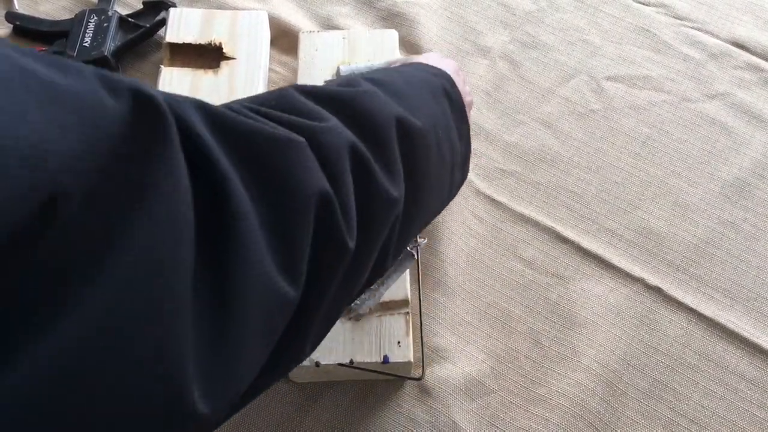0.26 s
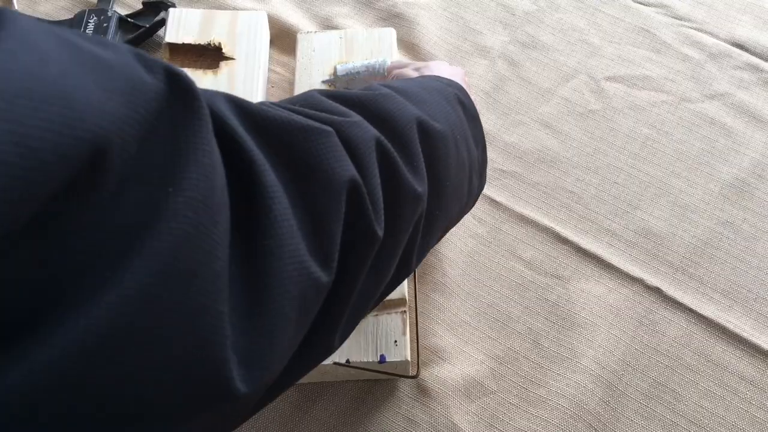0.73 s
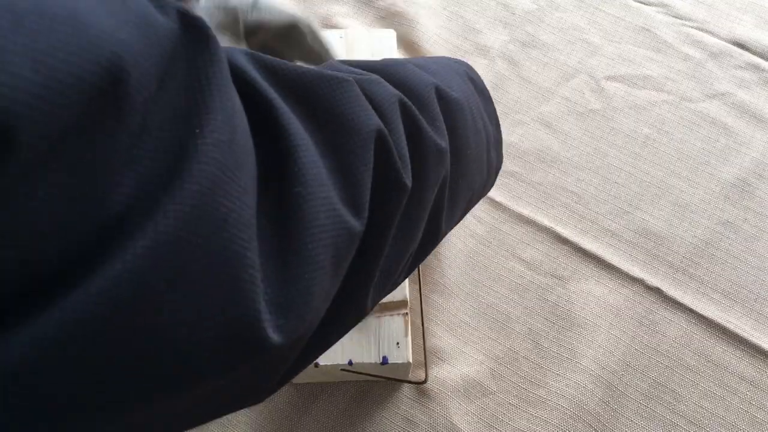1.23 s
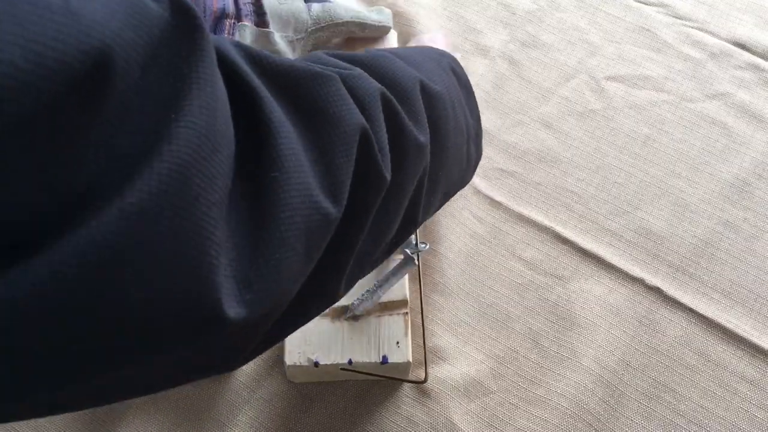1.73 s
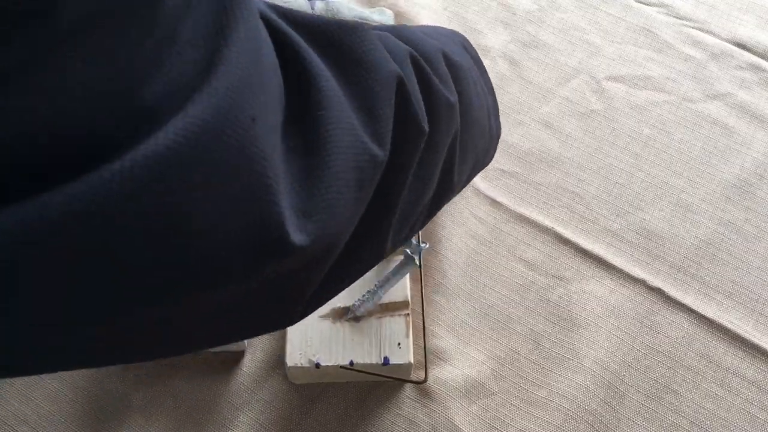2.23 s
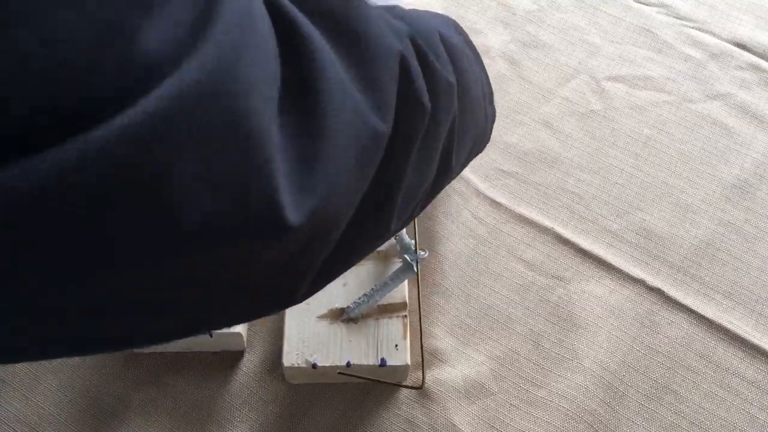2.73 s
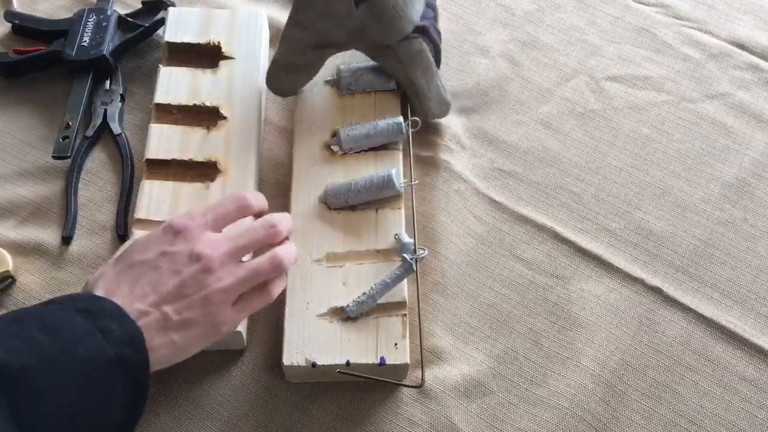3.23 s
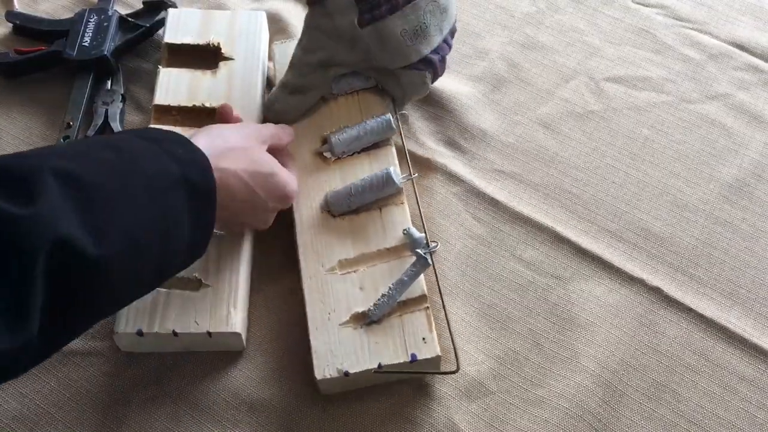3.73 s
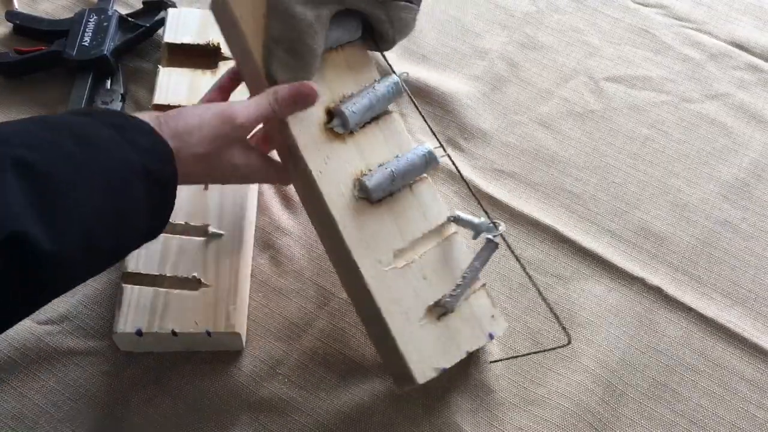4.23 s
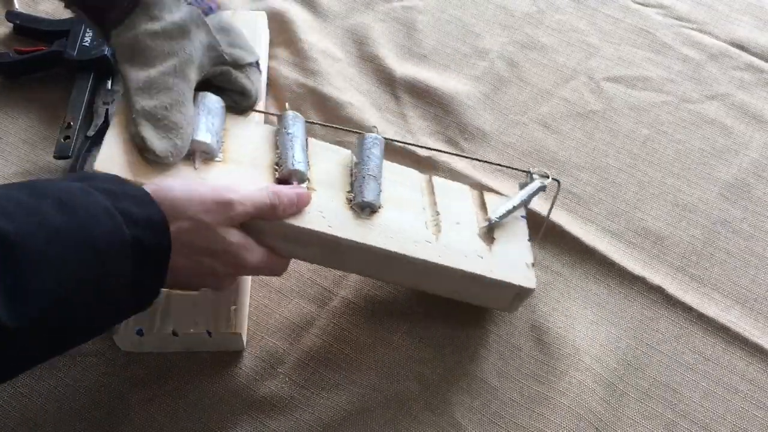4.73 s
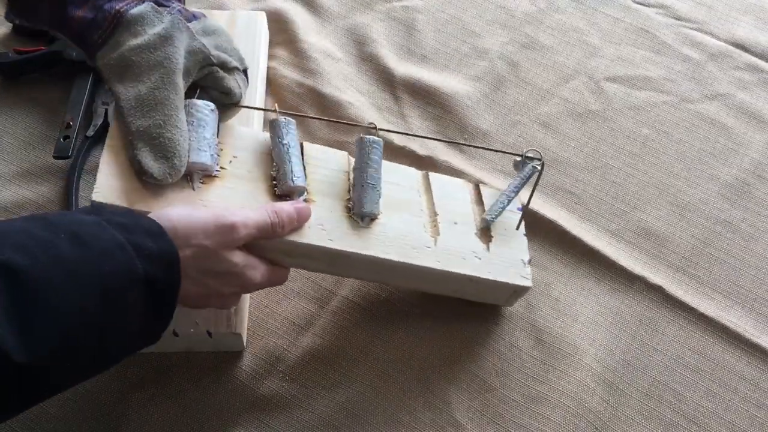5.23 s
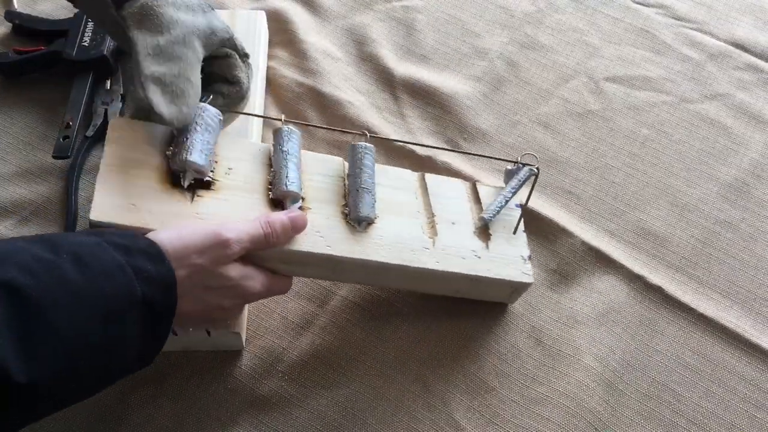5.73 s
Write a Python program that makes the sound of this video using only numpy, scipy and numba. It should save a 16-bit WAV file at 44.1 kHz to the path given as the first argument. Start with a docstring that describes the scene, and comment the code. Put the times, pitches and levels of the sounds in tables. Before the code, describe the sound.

Close, centred pickup of hands working on a cloth-covered table. At first sparse hollow wood knocks, faint squeaks, light jiggling of metal and soft table thuds over low room rumble; next, stronger fabric swishes. After four seconds the block drags and its wire chatters brightly; from five seconds, crisp snaps of lead leaving the grooves, with clacks and small tinks.

```python
"""First a sleeve swishes over a cloth-covered table, and twisted lead sinkers squeak in a wooden mould.
Hands then knock the wood (short clacks and hollow ringing modes), sinkers jiggle and the table thuds.
Around three seconds in, the cloth strokes (uneven, filtered noise) grow stronger. Past four seconds the
block is turned and dragged with a rasp and squeal (friction noise in resonances), and its wire frame
rattles. From five seconds, sinkers snap free as sharp clicks. The small room rumbles softly throughout."""
import sys
import numpy as np
from scipy import signal
from scipy.fft import rfft, irfft
from scipy.io import wavfile
from scipy.ndimage import uniform_filter1d
from numba import njit

SR = 44100
rng = np.random.default_rng(int(sys.argv[2]) if len(sys.argv) > 2 else 0)


def transcribe(signal):
    """Save signal, clipped to [-1, 1], as a 16-bit WAV file at the path in sys.argv[1]."""
    frames = np.atleast_2d(signal).T
    limited = np.clip(frames, -1, 1)
    pcm = np.round(limited * 32767).astype(np.int16)
    wavfile.write(sys.argv[1], SR, pcm)


N = 262836  # length of the scene [samples]
T = np.arange(SR // 4) / SR  # time since a blow [s]

# Hands knock the wood: (time [s], clack level [dB], clack pitch [Hz], hollow body level [dB],
# body pitch [Hz], bright edge level [dB])
KNOCKS = [(0.185, -58, 1220, -47, 360.5, -75), (0.985, -44, 1306, -35, 359, -57),
          (1.158, -49, 1456, -56, 356, -54), (1.265, -51, 1304, -71, 366, -79),
          (1.321, -54.5, 1290, -69, 353, -81), (1.6394, -46.5, 1700, -45.5, 379, -44.5),
          (1.649, -45.5, 1750, -44, 256.6, -50), (1.737, -51.5, 1140, -41, 237, -66.5),
          (1.775, -57, 1310, -48, 250, -63), (1.925, -45.5, 1370, -64, 344, -70),
          (2.0, -67, 1200, -44, 247, -70), (2.455, -54.5, 1186, -55.5, 376, -56.5),
          (2.835, -57, 1460, -55, 257, -51), (3.577, -73, 1000, -48, 315, -54.5),
          (4.217, -47, 1350, -43, 328, -45.5), (4.229, -44.5, 1090, -45, 269, -45.5),
          (4.761, -53, 1190, -68, 357, -55), (5.014, -46.5, 1230, -64, 364, -67),
          (5.057, -44.5, 1060, -66, 358, -49), (5.0818, -37, 1015, -44, 292, -45.5),
          (5.267, -49, 750, -53, 365, -53), (5.457, -48, 1050, -57, 246, -56),
          (5.898, -38.5, 922, -43, 242, -45), (5.954, -44.5, 900, -52, 300, -53)]
# A clack's colour: (ratio to its pitch [-], relative level per Hz [dB])
CLACK_COLOUR = [(.2, 0), (.5, -3.5), (.8, 7), (1, 0.5), (1.3, 3.5), (1.7, -13.5), (3, -14), (6, -44)]
# The hard edge of a knock: (frequency [Hz], relative level per Hz [dB])
EDGE_COLOUR = [(1200, -2), (2100, 0), (3300, -2), (4200, -9.5), (5500, -16), (9000, -16.5), (16000, -25)]
# Ringing of the wooden block: (ratio to the body pitch [-], relative level [dB], time to fall 60 dB [s])
BLOCK_MODES = [(.55, 11.5, 0.045), (.7, -10, 0.021), (0.917, 2.5, 0.14), (1.002, -11, 0.14),
               (1.142, -2.5, 0.24), (1.3, 2.5, 0.084), (1.5, -16, 0.094)]
CONTACT_T60_S = 0.058  # the main noise of a clack or edge falls 60 dB in this time

# Lead snaps free of its groove: (time [s], tick level [dB], woody crack level [dB])
SNAPS = [(5.0145, -38, -46.5), (5.029, -28.5, -50), (5.046, -30, -58), (5.0563, -29.5, -56),
         (5.069, -37, -66), (5.097, -40, -60), (5.4135, -21, -32.5), (5.926, -34, -56)]
# Bright tick of metal on a hard edge: (frequency [Hz], relative level per Hz [dB])
TICK_COLOUR = [(1500, -40), (4500, -27), (6400, -21), (7200, -24), (8130, -16), (9800, -20), (11300, -10),
               (12400, -11), (13700, -2), (14600, -3), (15700, 0), (16500, -2), (17500, -12)]
# Woody crack of a snap: (frequency [Hz], relative level per Hz [dB])
CRACK_COLOUR = [(300, -15), (1100, -11.5), (1700, -27), (2500, -5.5), (3050, -6), (3800, -8), (4400, -12),
                (5200, -12), (9000, -21)]
# Ringing of the groove wall: (frequency [Hz], relative level [dB], time to fall 60 dB [s])
GROOVE_MODES = [(2660, 0, 0.011), (3140, -4, 0.01), (3670, 5, 0.0029), (4200, -13, 0.022),
                (6440, -11.5, 0.0083)]

# Shoves that scrape the block along: (start [s], length [s], level before mixing its parts [dB],
# squeal pitch before its wobble [Hz])
SHOVES = [(4.38, .11, -52, 1023), (4.554, 0.031, -52.5, 865), (4.673, 0.059, -54.5, 957),
          (4.843, 0.063, -55.5, 960), (5.051, 0.062, -48.5, 986)]
SHOVE_ATTACK_S, SHOVE_RELEASE_S = 0.034, 0.02
# Rasp of the dragged block: (frequency [Hz], relative level per Hz [dB])
RASP_COLOUR = [(500, 15), (900, -16), (1700, -25), (2400, 10), (3000, 2), (3900, 10), (4600, -12),
               (5100, -7), (6200, 0), (7300, 6), (8400, 9.5), (11000, -5)]
# Sharp resonances of the scraping frame: (middle frequency [Hz], width [Hz], middle relative level [dB])
FRAME_MODES = [(864, 75, 3), (1282, 34, 7), (1730, 37, -0.5), (1845, 69, -11), (2950, 140, 1),
               (4510, 240, -0.5), (5500, 120, -2.5), (6400, 290, -6), (9800, 590, -12), (11900, 990, -3.5)]

# Bouts of the wire frame rattling: (start [s], length [s], first low ring [dB], first high ring [dB])
RATTLES = [(4.4105, .01, -45, -46.5), (4.534, .055, -38.5, -36.5), (4.628, .055, -49, -44.5),
           (4.845, .01, -48, -44.5)]
# Low bending modes of the wire: (frequency [Hz], relative level [dB], time to fall 60 dB [s])
WIRE_LOW = [(883, 0.5, 0.082), (871.3, 0.5, 0.077), (960, -20, 0.059), (1234, -6.5, 0.12), (1470, -23, 0.1),
            (1745, -13, 0.14), (1920, -14.5, 0.15), (2840, -20, 0.041)]
# High modes of the wire: (frequency [Hz], relative level [dB], time to fall 60 dB [s])
WIRE_HIGH = [(8400, -8, .06), (11960, -7, .06), (12345, -5, .07), (12750, -7, .07), (13472, 0, .12),
             (14730, -8, .04)]
# Wire chattering on wood: (frequency [Hz], relative level per Hz [dB])
CHATTER_COLOUR = [(300, -31), (650, 7), (950, 13.5), (1900, 0), (2400, -3.5), (4400, -7), (5200, -8),
                  (9000, -4), (12000, -27)]
# Average time between bounces, its uneven share, and the 60 dB fall time of the chatter noise
BOUNCE_S, BOUNCE_SCATTER, CHATTER_T60_S = .02, .1, 0.12
BOUNCE_LOW_DB, BOUNCE_HIGH_DB = -0.3, -1  # change at each bounce: the high ring weakens sooner

# Loose sinkers jiggle: (start [s], length [s], middle level [dB], lowest pitch [Hz], highest pitch [Hz])
JIGGLES = [(1.168, .18, -69, 1090, 2980), (1.655, .15, -66.5, 1170, 3080), (2.458, .14, -73, 1100, 2600),
           (4.407, 0.14, -55, 990, 5970), (4.631, 0.19, -61, 1000, 5000), (5.028, .085, -49.5, 900, 4000),
           (5.909, .05, -55, 900, 4020)]
JIGGLE_PER_S, JIGGLE_SCATTER_DB, JIGGLE_T60_S = 49, 4, .02

# Lead squeaking as it is twisted: (start [s], length [s], level [dB])
SQUEAKS = [(0.179, 0.041, -66), (0.248, 0.021, -61), (0.293, 0.021, -65)]
SQUEAK_START_HZ, SQUEAK_SAG_HZ_PER_S = 3770, 2500

# Brief rubs of finger, lead or wood: (time of peak [s], level [dB], pitch [Hz],
# time for the swell to fall to about a third on either side [s])
RUBS = [(0.267, -57.5, 2280, 0.013), (2.846, -45, 1360, 0.0088), (2.839, -51, 11900, 0.0079),
        (3.335, -53.5, 715, 0.004), (3.627, -48.5, 1400, 0.0059), (4.178, -51, 1470, 0.012),
        (4.467, -53.5, 5040, 0.021), (4.576, -47.5, 4530, .004), (4.841, -51, 4160, 0.015),
        (5.286, -52.5, 4460, 0.016), (5.391, -51, 1130, 0.033), (5.473, -49, 13600, .003),
        (5.673, -57, 1570, 0.0092), (5.902, -40, 900, 0.0055), (5.948, -45, 13500, 0.016)]
# Small tinks of wire loops: (time [s], main pitch before a slight random shift [Hz], level [dB],
# time to fall 60 dB [s])
TINKS = [(0.183, 9800, -57, .03), (1.265, 6480, -56, .2), (1.4673, 9650, -55, 0.017),
         (5.082, 8370, -43, 0.064), (5.269, 14400, -44, 0.057)]
# Soft thuds of the table: (time [s], level [dB])
THUDS = [(0.984, -34.5), (1.999, -38), (2.729, -36), (3.574, -39.5), (4.193, -33.5), (4.373, -39),
         (4.814, -36.5), (5.069, -34), (5.436, -33), (5.948, -38.5)]
# The table judders as the block is turned: (start [s], length [s], level [dB])
TURN = (4.42, 0.35, -45.5)

# Strokes of sleeve and glove over cloth: (start [s], length [s], swish level before mixing [dB],
# fine hiss level before mixing [dB])
STROKES = [(0.01, 0.18, -63.5, -58.5), (0.267, 0.065, -62.5, -70), (1.197, 0.52, -62.5, -67.5),
           (1.465, 0.13, -58, -61.5), (1.954, 0.063, -64.5, -65), (2.97, 0.12, -51.5, -56),
           (3.073, 0.099, -49.5, -50), (3.308, 0.14, -53.5, -52), (3.475, 0.19, -52, -51),
           (3.839, 0.013, -53.5, -59), (3.96, 0.079, -59.5, -56.5), (4.175, 0.012, -50.5, -50.5),
           (4.43, .08, -53.5, -48)]
STROKE_ATTACK_S, STROKE_RELEASE_S = 0.021, 0.031
# The cloth keeps rubbing between strokes, more once the block is held:
# (time [s], swish level before mixing [dB])
STEADY_RUB = [(0, -64.5), (.7, -69.5), (1.75, -70), (2.15, -68), (2.6, -74.5), (2.9, -57), (4.3, -59.5),
              (5.15, -60), (5.96, -59.5)]
# Fine hiss at the loudest steady rub, before mixing, and dB of hiss per dB of rub
RUB_HISS_DB, RUB_HISS_SLOPE = -60.5, 0.57
# Sleeve on cloth: (frequency [Hz], relative level per Hz [dB])
SLEEVE_COLOUR = [(200, -2), (600, 0), (1200, 2), (2000, -2.5), (2800, 1), (4900, -8), (6200, -1),
                 (7800, -11), (9100, -1), (10500, -6), (12000, -3), (13500, 2.5), (15700, -1.5),
                 (16200, -35)]

# Rumble of the room: (frequency [Hz], relative level per Hz [dB])
ROOM_COLOUR = [(12, -20), (20, -24.5), (68, -1), (101, -4.5), (134, -0.5), (198, -13), (234, -14.5),
               (472, -26), (590, -29), (1150, -37.5), (1370, -35.5), (2140, -51), (3340, -55), (7950, -65),
               (16000, -67)]
ROOM_RUMBLE_DB = -48.5  # middle level, around which the rumble wanders and rises
RUMBLE_RISE_DB_PER_S = 0.15  # the rumble grows as the handling gets busier
TOP_HZ = 16450  # sound above this is left out


def knocks(push_s=0.00083, tail_ratio=7):
    """Wood gives a short clack and a slower hollow ring, and leaves a wash in the room."""
    out = np.zeros(N)
    push = 1 - np.exp(-(T / push_s) ** 2)  # wood yields, so the force takes a moment to build
    tail_t60 = tail_ratio * CONTACT_T60_S
    for s, clack_db, clack_hz, body_db, body_hz, edge_db in KNOCKS:
        wood = [(ratio * clack_hz, db) for ratio, db in CLACK_COLOUR]
        tock_modes = [(clack_hz * 0.917, -3, .025), (clack_hz, 0, .04), (clack_hz * 1.2, -4, .035)]
        tock = ring(tock_modes, 1.8, 0.037)
        clack = 1.06 * tock + burst(wood, CONTACT_T60_S) + undb(-5) * burst(wood, tail_t60)
        edge = burst(EDGE_COLOUR, CONTACT_T60_S) + undb(-5) * burst(EDGE_COLOUR, tail_t60)
        block = [(ratio * body_hz, db, decay) for ratio, db, decay in BLOCK_MODES]
        wash = [(60, -20), (body_hz / 2, -2), (body_hz * 0.87, 0), (body_hz * 2, -18), (4000, -60)]
        body = ring(block, 0.28, 0.043) + undb(-7) * burst(wash, 0.54)
        knock = loud(push * clack, clack_db) + loud(push * edge, edge_db) + loud(push * body, body_db)
        add(out, s, knock)
    return out


def snaps(echo_s=0.0086, echo_db=-20, room_db=-15, crack_room_db=-8):
    """Lead lets go of the wood in under a millisecond; a near surface and the room answer faintly."""
    out = np.zeros(N)
    for s, tick_db, crack_db in SNAPS:
        tick = click(TICK_COLOUR) + .3 * burst(TICK_COLOUR, .006)
        tick = tick + undb(room_db) * burst(TICK_COLOUR, 0.17)
        crack = ring(GROOVE_MODES, 1, .02) + .3 * burst(CRACK_COLOUR, .02)
        crack = crack + undb(crack_room_db) * burst(CRACK_COLOUR, 0.29)
        snap = loud(tick, tick_db) + loud(crack, crack_db)
        add(out, s, snap)
        add(out, s + echo_s, undb(echo_db) * snap)
    return out


def scrape(width_hz=80.0, squeal_db=-4, rasp_db=-7, frame_db=-3, unevenness_db=2.5):
    """Stick and slip rasp along the block, ring the frame and excite a squeal that shifts with each shove."""
    force = sum(undb(db) * swell(s, length, SHOVE_ATTACK_S, SHOVE_RELEASE_S)
                for s, length, db, _ in SHOVES)
    hz, = curves([(s + length / 2, pitch) for s, length, _, pitch in SHOVES])
    slips = catches(0.5)
    hz = hz * (1 + 0.069 * walk(25))  # the squeal wobbles
    squeal = resonate(resonate(slips, hz, width_hz), hz, 4 * width_hz)
    frame = np.zeros(N)
    for f, width, level in FRAME_MODES:
        gain = undb(level + 3.6 * walk(25))
        frame += gain * resonate(slips, f * (1 + 0.0095 * walk(21)), float(width))
    parts = undb(squeal_db) * squeal / squeal.std()
    parts = parts + undb(frame_db) * frame / frame.std()
    parts = parts + undb(rasp_db) * colour(slips, RASP_COLOUR)
    return force * undb(unevenness_db * walk(60)) * parts


def rattles(chatter_db=0, touch_db=-7):
    """The wire lands with a tick, chatters against lead and wood, rings on and bounces until the bout ends."""
    out = np.zeros(N)
    for s, length, low_db, high_db in RATTLES:
        for k in range(int(length / BOUNCE_S) + 1):
            chatter = undb(chatter_db) * burst(CHATTER_COLOUR, CHATTER_T60_S)
            low = ring(WIRE_LOW, 1.0, 0.0093) + chatter + undb(touch_db) * click(CHATTER_COLOUR)
            high = ring(WIRE_HIGH, 2, .0006) + 1.2 * burst(TICK_COLOUR, CHATTER_T60_S)
            high = high + .35 * click(TICK_COLOUR)
            add(out, s, loud(low, low_db + k * BOUNCE_LOW_DB) + loud(high, high_db + k * BOUNCE_HIGH_DB))
            s = s + BOUNCE_S * (1 + BOUNCE_SCATTER * rng.standard_normal())
    return out


def jiggles(count=24):
    """Loose sinkers make light random contacts, each a dry tap with its own colour."""
    out = np.zeros(N)
    for s, length, db, low_hz, high_hz in JIGGLES:
        for k, (late, place, size) in enumerate(rng.random((count, 3))):
            delay = (k + late) / JIGGLE_PER_S
            hz = low_hz * (high_hz / low_hz) ** place
            tap_colour = [(hz / 4, -24), (hz / 2, -10), (hz, 0), (hz * 2, -14), (hz * 4, -34)]
            tap = burst(tap_colour, JIGGLE_T60_S)
            if delay < length:
                add(out, s + delay, loud(tap, db + JIGGLE_SCATTER_DB * (2 * size - 1)))
    return out


def squeaks(width_hz=55.0, edge_s=0.0028):
    """Twisted lead sings in a narrow band that sags as the twist slows."""
    out = np.zeros(N)
    for s, length, db in SQUEAKS:
        elapsed = np.clip(np.arange(N) / SR - s, 0, length)
        hz = SQUEAK_START_HZ - SQUEAK_SAG_HZ_PER_S * elapsed
        sing = resonate(resonate(rng.standard_normal(N), hz, float(width_hz)), hz, 4. * width_hz)
        out += undb(db) * swell(s, length, edge_s, edge_s) * sing / sing.std()
    return out


def rubs(width_ratio=0.066):
    """A short slide swells and dies, singing a little at one pitch."""
    out = np.zeros(N)
    middle = T.mean()
    for s, db, hz, half in RUBS:
        grit_colour = [(ratio * hz, level) for ratio, level in CLACK_COLOUR]
        grit = colour(rng.standard_normal(len(T)), grit_colour)
        sing = resonate(grit, np.full(len(T), float(hz)), float(width_ratio * hz))
        shape = np.exp(-np.abs((T - middle) / half) ** 0.91)
        add(out, s - middle, loud((grit + 0.86 * sing) * shape, db))
    return out


def tinks():
    """A wire loop rings with a close pair of modes over a tiny tick."""
    out = np.zeros(N)
    for s, hz, db, t60 in TINKS:
        pair = ring([(hz, 0, t60), (hz * 0.93, -5, t60)], 0.63, 0.0066)
        tick = burst([(hz / 2, -25), (hz, 0), (hz * 2, -30)], 0.013)
        add(out, s, loud(pair + 0.9 * tick, db))
    return out


def thuds(table_hz=137, t60=0.19, push_s=0.0035, judder_width_hz=18.0):
    """Soft, slow pushes set the table top swinging; it judders while the block is turned."""
    out = np.zeros(N)
    push = 1 - np.exp(-(T / push_s) ** 2)
    for s, db in THUDS:
        swing = ring([(table_hz, 0, t60), (105, -9, .08), (175, -10, .08)], 6.5, 0.005)
        add(out, s, loud(swing * push, db))
    start, length, db = TURN
    hz = np.full(N, float(table_hz))
    judder = resonate(rng.standard_normal(N), hz, float(judder_width_hz))
    judder = resonate(judder, hz, 3.1 * judder_width_hz)
    turning = undb(db) * swell(start, length, SHOVE_ATTACK_S, SHOVE_RELEASE_S)
    return out + turning * judder / judder.std()


def cloth(grain=0.26, swish_db=-3.5, hiss_db=-1, scuff_db=-9):
    """Threads slip over each other; folds make swish and hiss flutter apart and add dull scuffs."""
    swish, hiss = rubbing()
    rustle = colour(catches(grain), SLEEVE_COLOUR)
    low = signal.sosfiltfilt(signal.butter(2, 8000, fs=SR, output="sos"), rustle)
    high = rustle - low
    folds = walk(38)
    scuffs = resonate(rng.standard_normal(N), 1000 * np.exp(0.49 * walk(14)), 570.0)
    swish_part = undb(swish + swish_db + 0.26 * folds) * low / low.std()
    hiss_part = undb(hiss + hiss_db + .5 * folds + 0.42 * walk(98)) * high / high.std()
    scuff_part = undb(swish + scuff_db + 2.1 * walk(25)) * scuffs / scuffs.std()
    return swish_part + hiss_part + scuff_part


def rubbing():
    """Swish and fine hiss of the cloth in dB: the strongest stroke of the moment over a light steady rub."""
    rub, = curves(STEADY_RUB)
    strokes = [(swell(s, length, STROKE_ATTACK_S, STROKE_RELEASE_S), swish_db, hiss_db)
               for s, length, swish_db, hiss_db in STROKES]
    stroke_swish = np.max([gain * undb(db) for gain, db, _ in strokes], axis=0)
    stroke_hiss = np.max([gain * undb(db) for gain, _, db in strokes], axis=0)
    steady_hiss = undb(RUB_HISS_DB + RUB_HISS_SLOPE * (rub - rub.max()))
    swish = np.hypot(undb(rub), stroke_swish)
    hiss = np.hypot(steady_hiss, stroke_hiss)
    return 20 * np.log10(swish), 20 * np.log10(hiss)


def reflect(x, lag_s=0.0026, share=0.19, sway=0.11):
    """The table top returns the sound of the moving arm a moment later, combing it."""
    i = np.arange(N)
    lag = lag_s * SR * (1 + sway * walk(3.6))  # the delay drifts around lag_s
    return (x + share * np.interp(i - lag, i, x)) / np.hypot(1, share)


def room_tone(hum_db=-55, hiss_db=-72):
    """A low rumble and a humming resonance slowly rise together, under thin hiss."""
    rumble = colour(rng.standard_normal(N), ROOM_COLOUR) * undb(ROOM_RUMBLE_DB + 0.75 * walk(4.86))
    hum_colour = [(40, -87), (115, -26.5), (137, -5.0), (160, -16.0), (500, -63)]
    hum = colour(rng.standard_normal(N), hum_colour)
    hiss_colour = [(500, 11.5), (1400, -4), (2000, 0), (3200, -7), (5000, -6.0), (15500, -5.0), (16300, -19)]
    hiss = colour(rng.standard_normal(N), hiss_colour)
    rise = undb(RUMBLE_RISE_DB_PER_S * (np.arange(N) - N / 2) / SR)
    return rise * (rumble + undb(hum_db) * hum) + undb(hiss_db) * hiss


def undb(db):
    """Turn decibels into gain."""
    return 10 ** (np.asarray(db) / 20)


def add(out, s, x):
    """Mix x into out from time s."""
    i = max(int(s * SR), 0)
    out[i:i + len(x)] += x[:max(N - i, 0)]


def gains(spectrum, n):
    """Read a spectrum's gain at each frequency of an n-point transform."""
    hz, db = np.transpose(spectrum)
    bins_hz = np.arange(n // 2 + 1) * SR / n
    return undb(np.interp(np.log(bins_hz + 1), np.log(hz), db))


def colour(x, spectrum):
    """Filter x by a spectrum and scale it to a standard deviation of 1."""
    y = irfft(rfft(x) * gains(spectrum, len(x)), len(x))
    return y / y.std()


def click(spectrum, size=1024):
    """Pack a spectrum's energy as early as possible into one pulse (minimum phase); energy 1."""
    cepstrum = irfft(np.log(gains(spectrum, size)))
    # folding the second half onto the first puts the energy at the start
    cepstrum[1:size // 2] *= 2
    cepstrum[size // 2 + 1:] = 0
    y = irfft(np.exp(rfft(cepstrum)))
    return np.pad(y / np.linalg.norm(y), (0, len(T) - size))


def fade(t60):
    """Die away exponentially, by 60 dB in t60 seconds."""
    return np.exp(-np.log(1000) * T / t60)


def burst(spectrum, t60):
    """Fading noise stands for crowded resonances or reflections dying together; energy 1."""
    y = colour(rng.standard_normal(len(T)), spectrum) * fade(t60)
    return y / np.linalg.norm(y)


def ring(modes, scatter_db, detune):
    """Fading sine modes, weighted and detuned anew by each point of contact; energy 1."""
    y = np.zeros(len(T))
    chance = rng.standard_normal((len(modes), 3))
    for (hz, db, t60), (strength, shift, sign) in zip(modes, chance):
        gain = np.sign(sign) * undb(db + scatter_db * strength)
        y += gain * np.sin(2 * np.pi * hz * (1 + detune * shift) * T) * fade(t60)
    return y / np.linalg.norm(y)


def loud(x, db, size=441):
    """Scale a blow so that its loudest 10 ms have this level."""
    power = uniform_filter1d(x ** 2, size, mode="constant")
    return x * undb(db) / np.sqrt(power.max())


def walk(rate):
    """Wander slowly at random with a spread near 1, taking rate new steps a second."""
    k = int(SR / rate)
    steps = rng.standard_normal(2048)[np.arange(N) // k]
    return uniform_filter1d(steps, k) / np.sqrt(2 / 3)


@njit
def resonate(x, hz, width):
    """A band-pass filter whose centre can move every sample."""
    y, band, low = np.empty(len(x)), 0., 0.
    for i in range(len(x)):
        g, k = np.tan(np.pi * hz[i] / SR), width / hz[i]
        v = (band + g * (x[i] - low)) / (1 + g * (g + k))
        band, low, y[i] = 2 * v - band, low + 2 * g * v, k * v
    return y


def curves(table):
    """Join the rows of a table with straight lines into one control per column."""
    s, *columns = np.transpose(table)
    return [np.interp(np.arange(N) / SR, s, c) for c in columns]


def catches(grain, size=16):
    """Friction: dense tiny slips of unequal strength, more unequal with more grain."""
    strength = np.exp(grain * rng.standard_normal(N // size + 1))
    return rng.standard_normal(N) * strength.repeat(size)[:N]


def swell(start, length, attack, release):
    """The gain of one movement: it gathers speed, holds and dies away."""
    t = np.arange(N) / SR
    return np.exp(-np.maximum(start - t, 0) / attack - np.maximum(t - start - length, 0) / release)


def scene():
    """Everything reaches one microphone, alike in both channels."""
    handling = knocks() + snaps() + scrape() + rattles() + jiggles() + squeaks() + rubs() + tinks()
    mono = handling + thuds() + reflect(cloth()) + room_tone()
    return np.array([mono, mono])


def record(dry):
    """A steep low-pass filter leaves out everything above TOP_HZ."""
    return signal.sosfilt(signal.ellip(8, .2, 70, TOP_HZ, fs=SR, output="sos"), dry)


dry = scene()
out = record(dry)
transcribe(out)
```